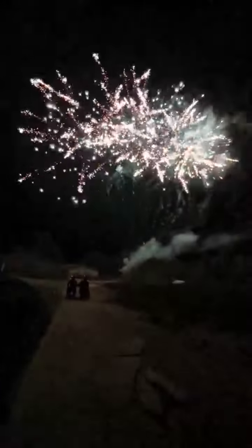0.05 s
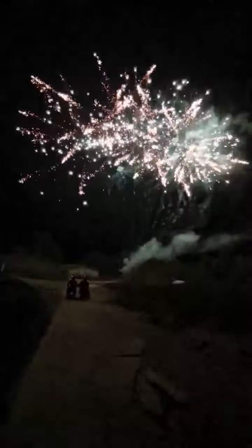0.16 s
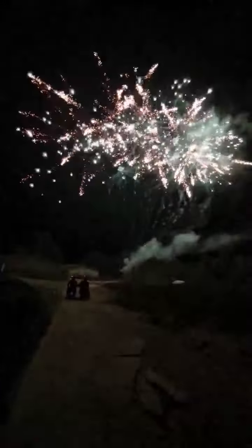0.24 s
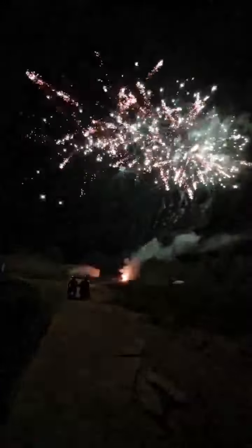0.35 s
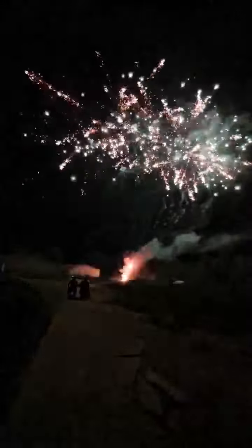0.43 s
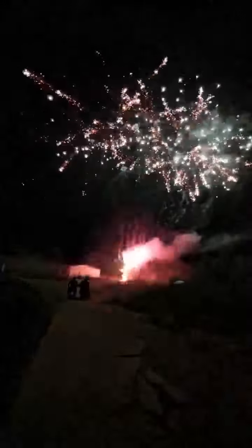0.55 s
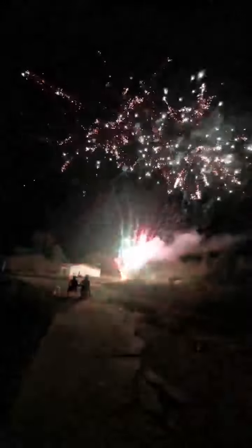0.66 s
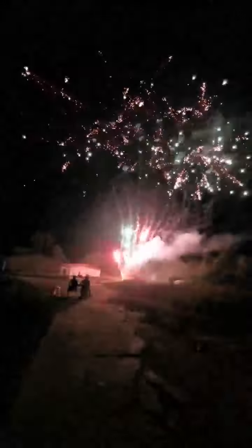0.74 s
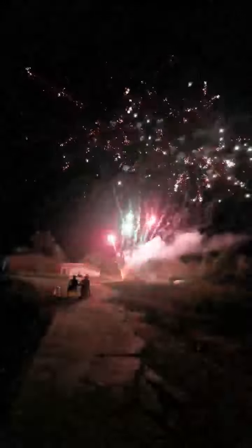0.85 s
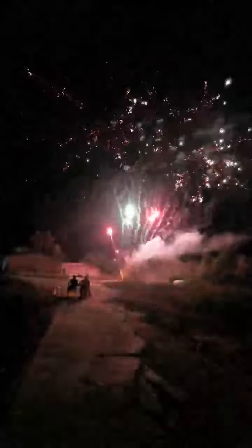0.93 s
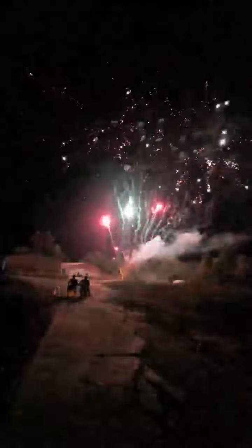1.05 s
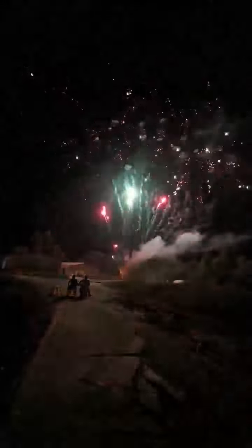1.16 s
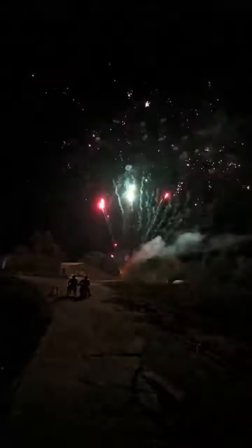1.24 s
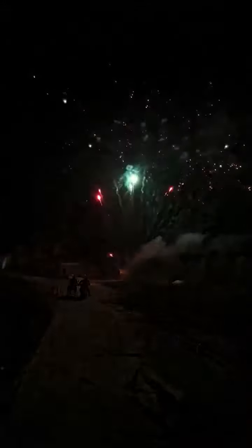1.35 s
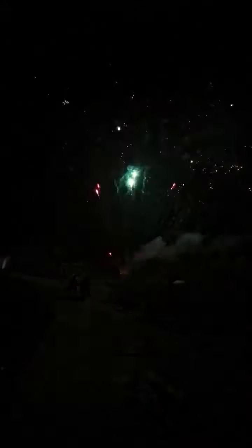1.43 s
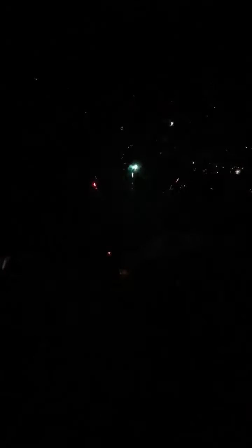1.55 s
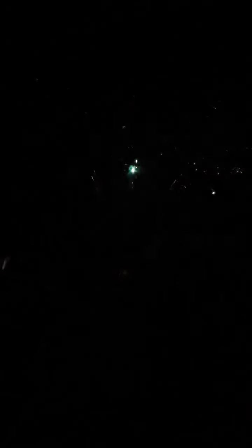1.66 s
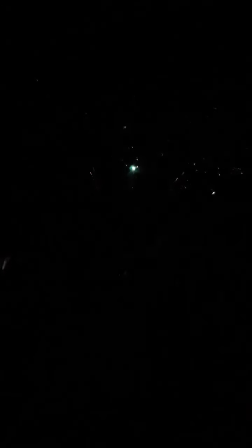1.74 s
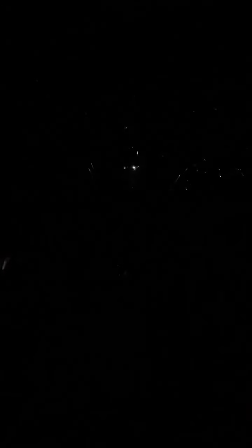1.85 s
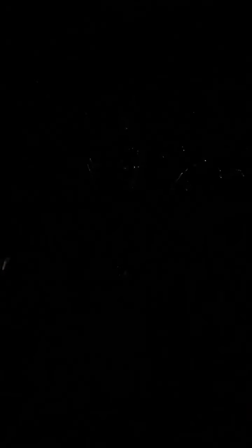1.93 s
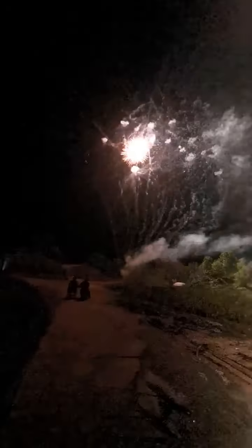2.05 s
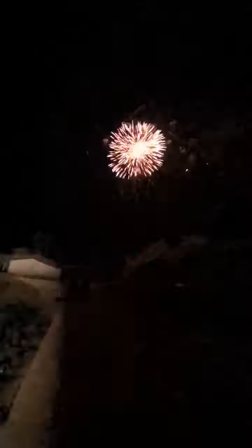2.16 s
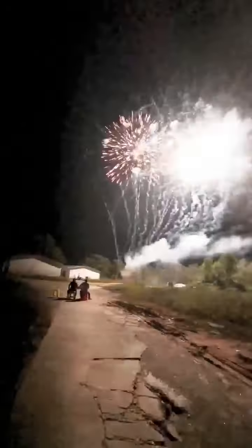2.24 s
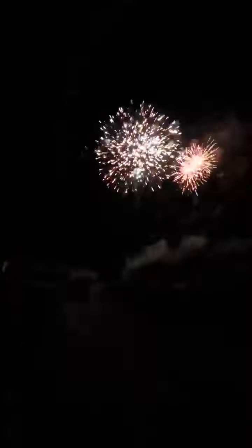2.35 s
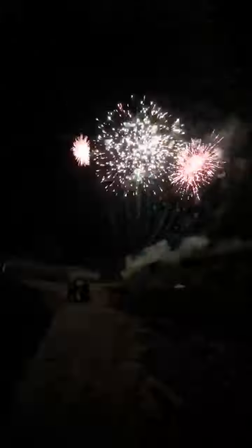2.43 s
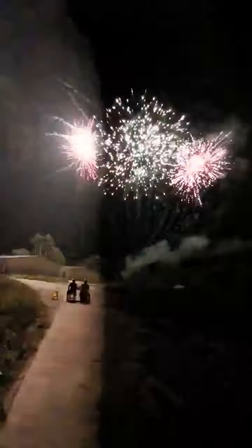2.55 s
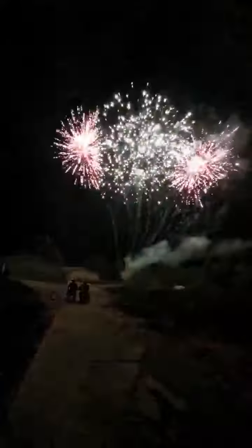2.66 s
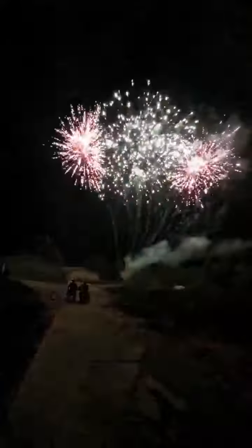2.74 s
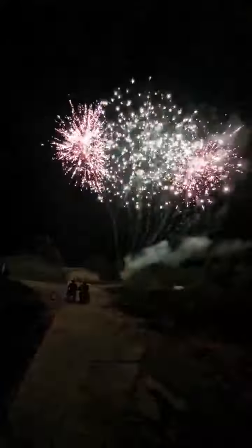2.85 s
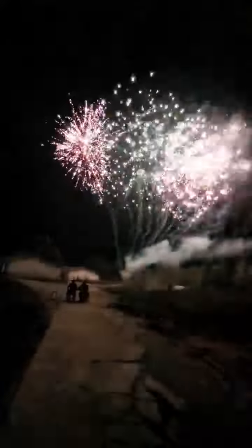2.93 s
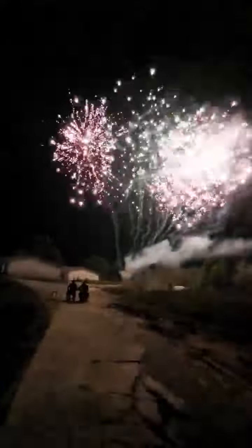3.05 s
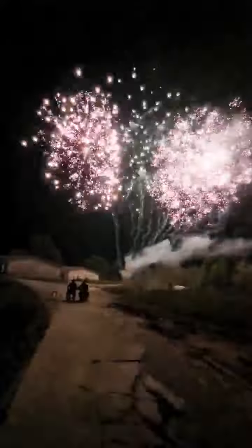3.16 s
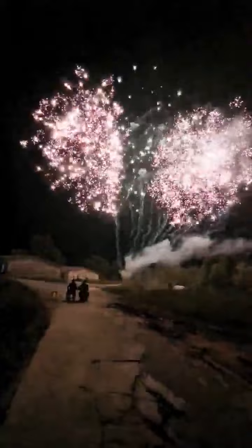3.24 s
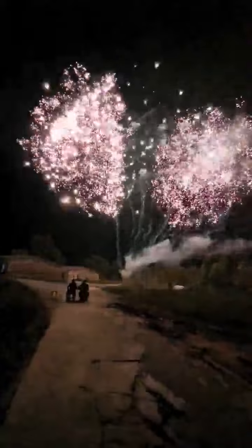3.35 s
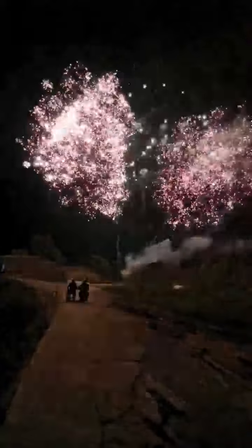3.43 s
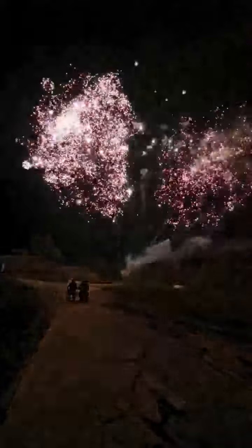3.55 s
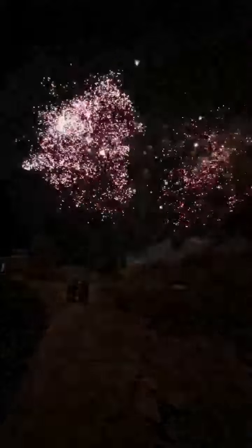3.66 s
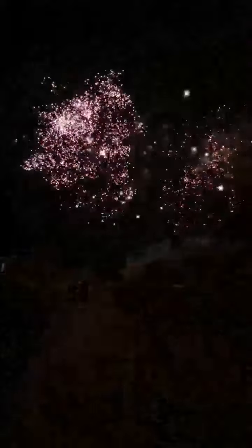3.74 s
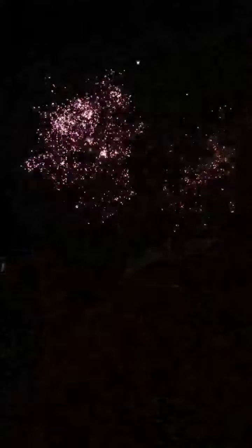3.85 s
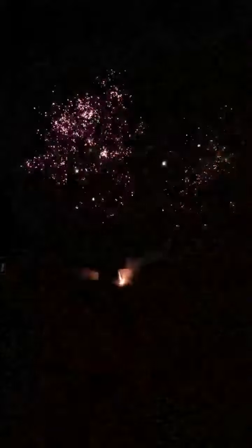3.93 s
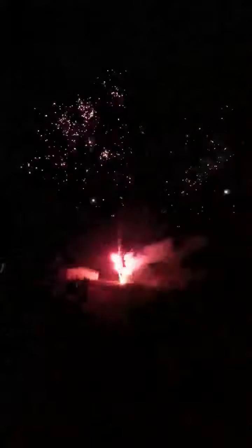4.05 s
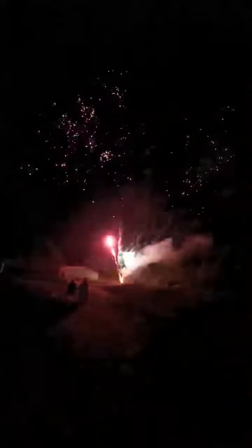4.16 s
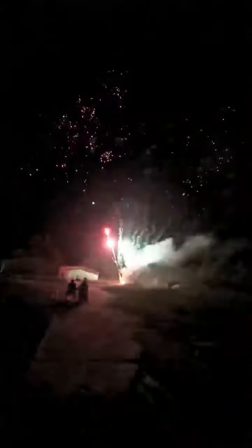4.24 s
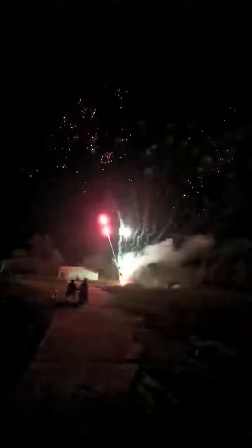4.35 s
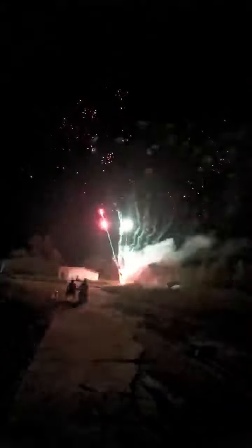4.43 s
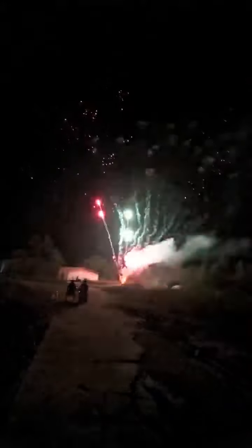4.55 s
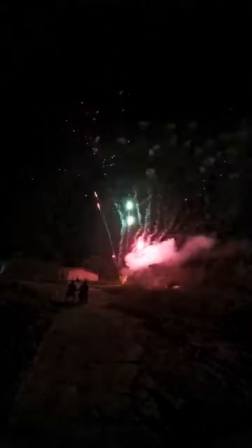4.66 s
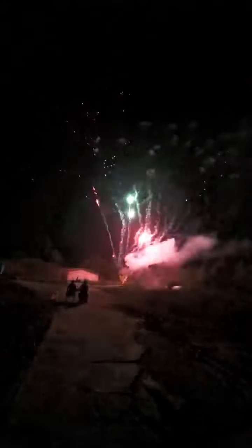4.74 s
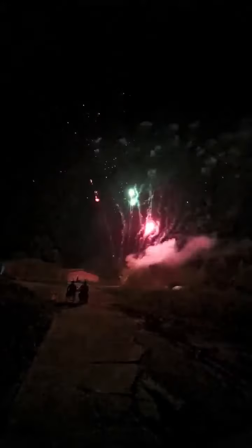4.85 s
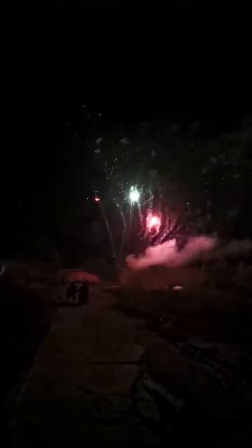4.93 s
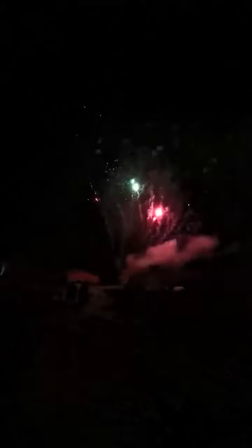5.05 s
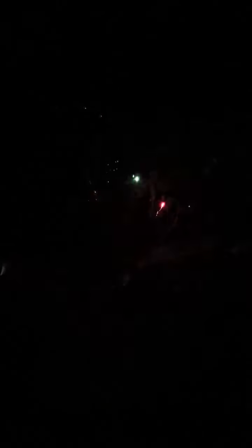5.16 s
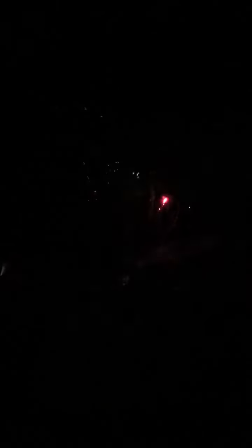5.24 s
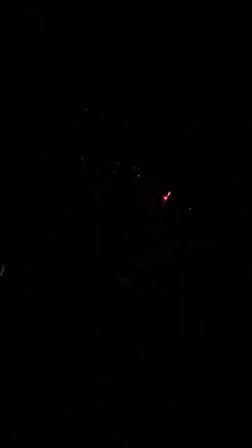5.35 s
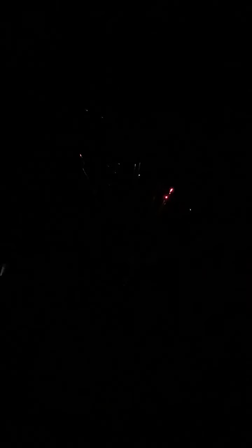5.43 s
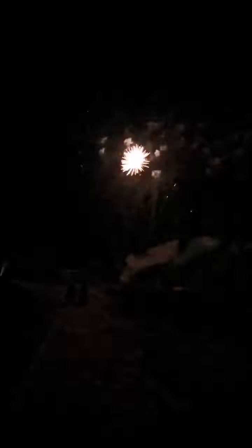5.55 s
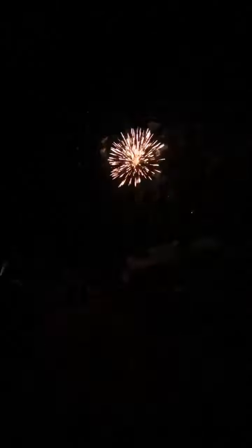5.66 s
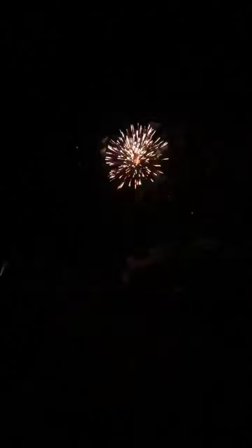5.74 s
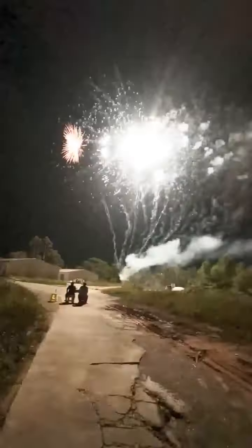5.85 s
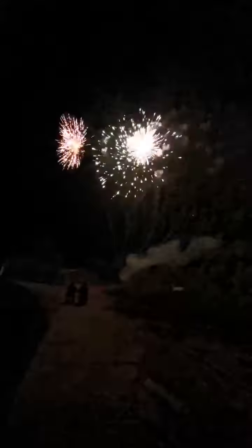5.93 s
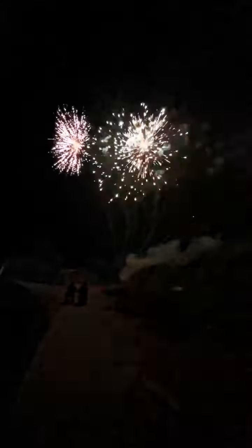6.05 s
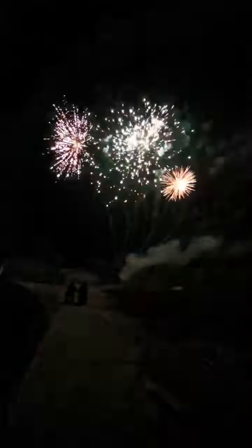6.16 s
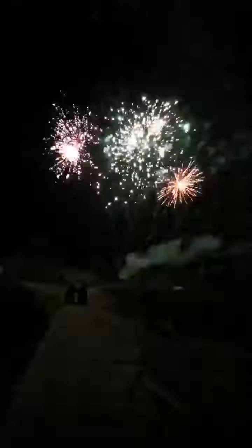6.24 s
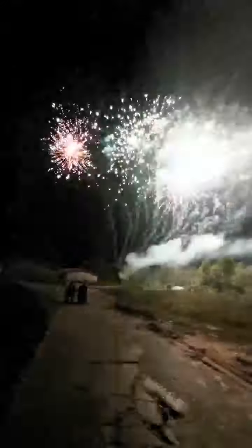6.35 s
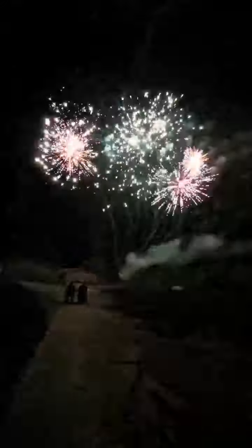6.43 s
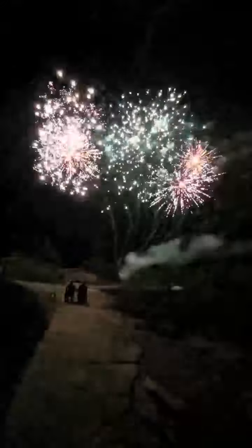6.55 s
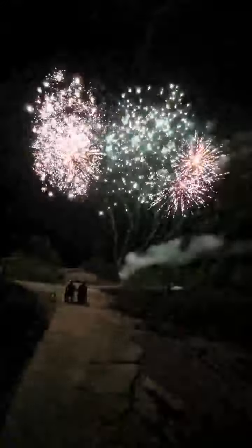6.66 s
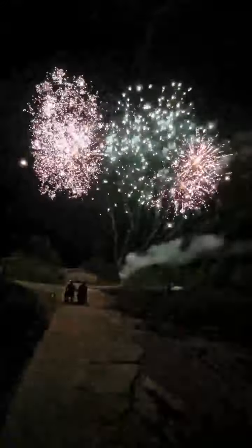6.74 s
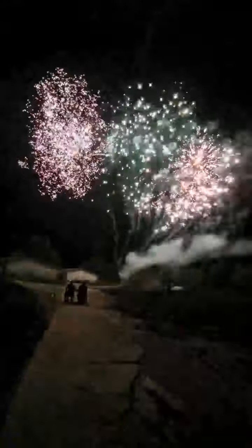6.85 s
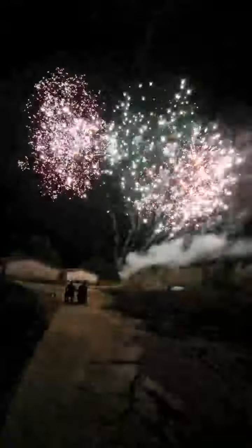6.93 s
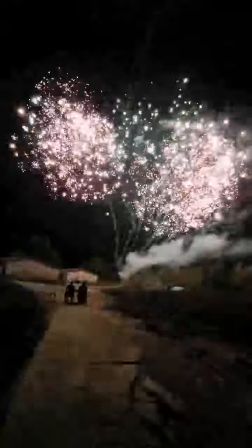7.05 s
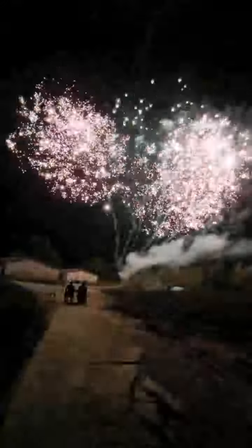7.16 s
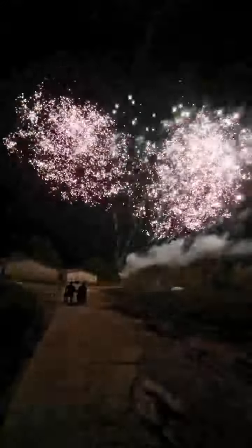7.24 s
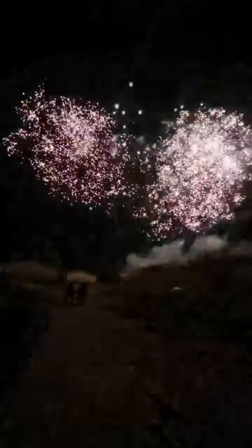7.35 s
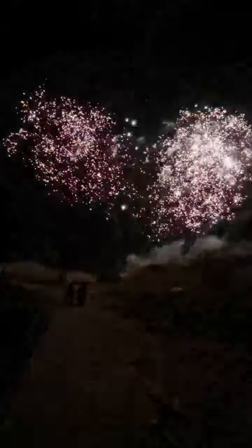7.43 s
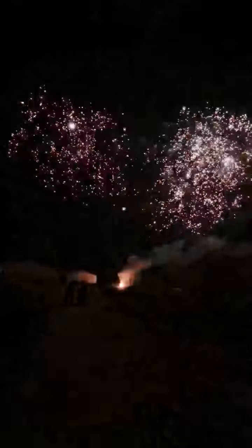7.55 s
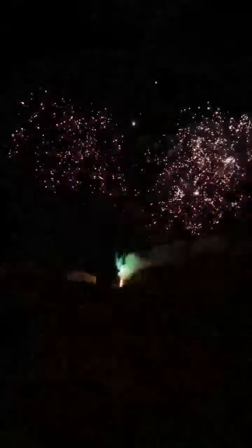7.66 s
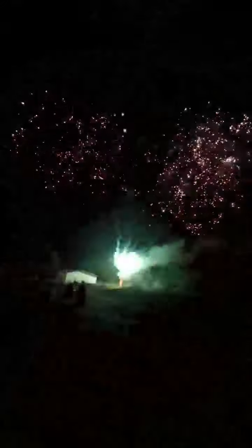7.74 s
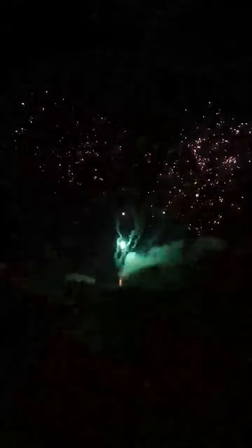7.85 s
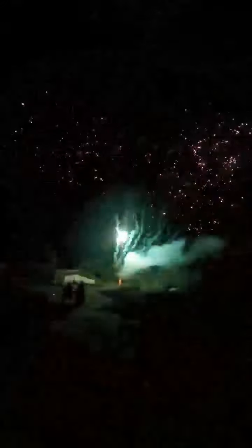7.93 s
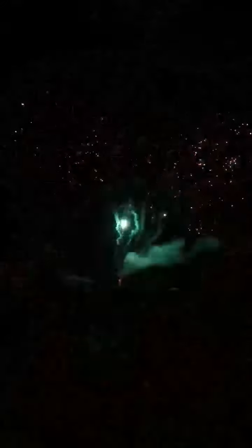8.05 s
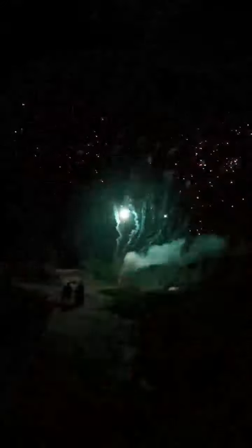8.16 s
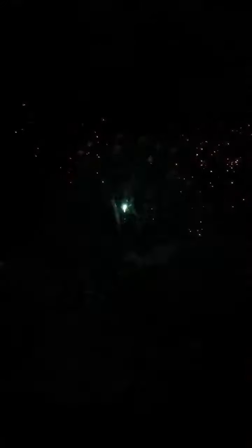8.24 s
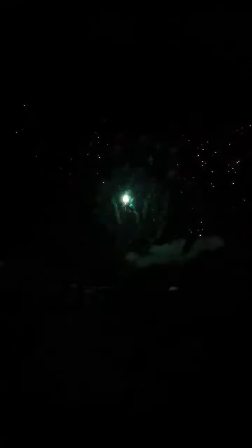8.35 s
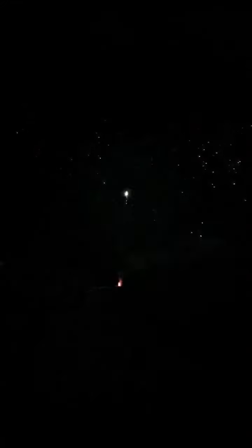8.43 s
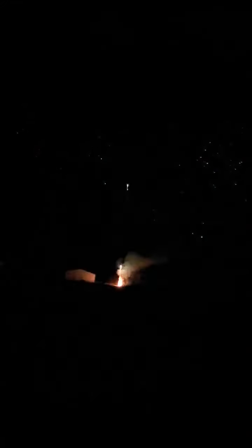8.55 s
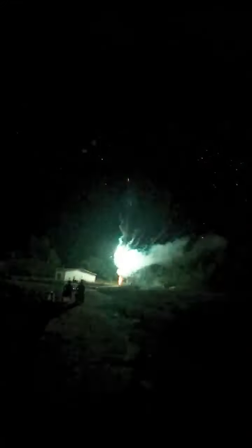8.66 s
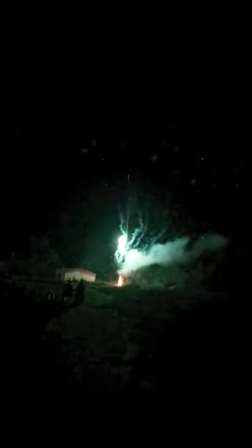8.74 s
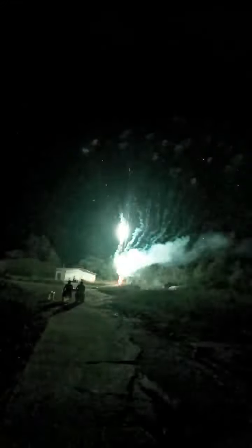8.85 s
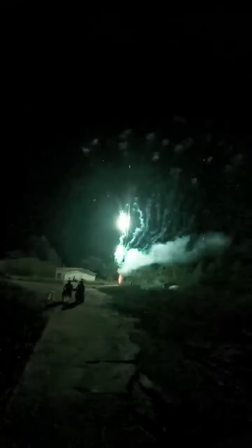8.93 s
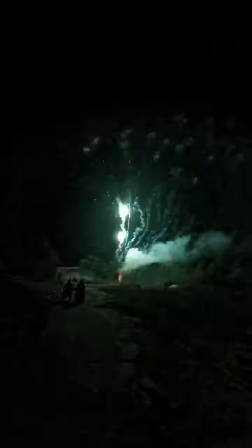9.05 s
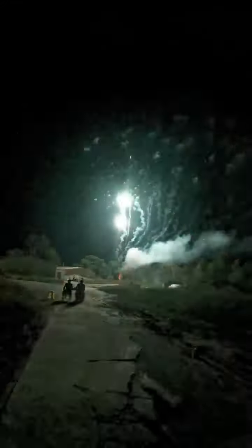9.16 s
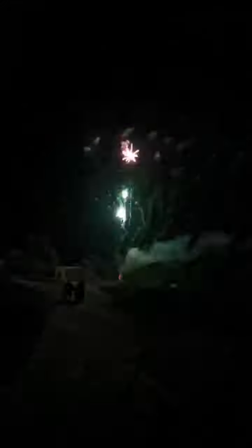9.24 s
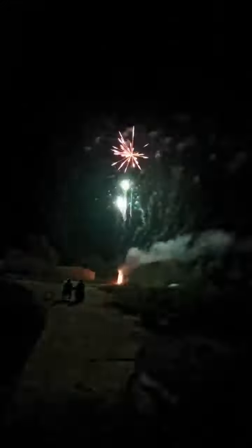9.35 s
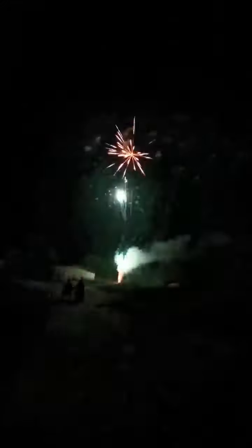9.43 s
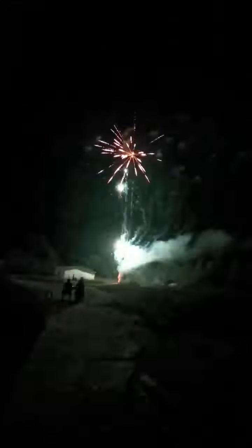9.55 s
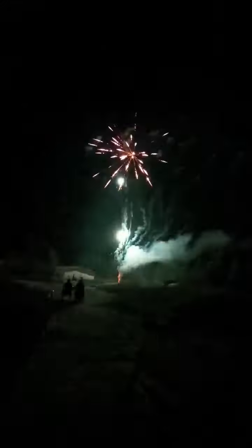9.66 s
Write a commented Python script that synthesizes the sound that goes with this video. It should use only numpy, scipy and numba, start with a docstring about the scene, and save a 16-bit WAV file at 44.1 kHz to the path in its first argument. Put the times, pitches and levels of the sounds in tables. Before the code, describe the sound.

Clusters of heavy firework thuds and sharp aerial bangs slap off nearby sheds, with sizzling crackle fading into quiet night air.

```python
"""Firework cake at night

Heard some sixty metres off, on open ground beside low sheds, over crickets and night air.
Lift charges thump from the tubes: pressure pulses over several paths, a crack, a knock, a shed slap.
Shells burst overhead: pulses straight and off the ground, shed echoes, a fence whistle, noise tails.
Stars crackle as random noise pops in four size bands; comet tails hiss as sputtering band noise.
The phone cuts bass, and its look-ahead compressor ducks just before each blast.
"""
import sys
import numpy as np
from scipy import signal
from scipy.fft import rfft, irfft
from scipy.io import wavfile
from scipy.ndimage import uniform_filter1d, minimum_filter1d
from numba import njit

SR = 44100
rng = np.random.default_rng(int(sys.argv[2]) if len(sys.argv) > 2 else 0)


def store_wav(level_fs):
    """Save 16-bit WAV to argv[1]."""
    pcm = np.round(np.clip(np.atleast_2d(level_fs), -1, 1) * 32767)
    wavfile.write(sys.argv[1], SR, pcm.T.astype(np.int16))


def makeup_ratio(level_db):
    """Linear amplitude ratio for a level in decibels (20 dB per factor of ten)."""
    decades = np.asarray(level_db, float) / 20
    return 10 ** decades


N = 427769
PREROLL = SR  # samples ahead of the start, for blasts already rolling


def unit(x):
    """Scale to rms 1."""
    return x / np.sqrt(np.mean(x ** 2))


def band(x, lo_hz, hi_hz):
    """Third-order Butterworth band-pass."""
    return signal.sosfilt(signal.butter(3, [lo_hz, hi_hz], "bandpass", fs=SR, output="sos"), x)


def lumps(count, width):
    """Slow random unevenness of rms 1: noise averaged over width samples."""
    return unit(uniform_filter1d(rng.standard_normal(count), size=width))


def colour(x, points):
    """Filter by (hz, gain_db) points; folding the cepstrum makes the response causal."""
    hz, gain_db = np.transpose(points)
    grid_hz = np.maximum(np.arange(1025) * SR / 2048, 1)
    gain = makeup_ratio(np.interp(np.log(grid_hz), np.log(hz), gain_db))
    ceps = irfft(np.log(gain))
    ceps[1:1024] *= 2
    ceps[1025:] = 0
    response = irfft(np.exp(rfft(ceps)))
    return signal.fftconvolve(x, response)[:len(x)]


def clicks(start_s, size):
    """Impulses on a time line that starts PREROLL samples early."""
    line = np.zeros(N + PREROLL)
    index = (np.asarray(start_s) * SR).astype(int) + PREROLL
    np.add.at(line, np.clip(index, 0, len(line) - 1), size)
    return line


def through(line, response):
    """Convolve, then drop the preroll."""
    return signal.fftconvolve(line, response)[PREROLL:PREROLL + N]


def spray(line, t60_s):
    """Each impulse becomes a noise burst of the same energy, decaying 60 dB in t60_s."""
    pole = makeup_ratio(-120 / (t60_s * SR))  # per-sample decay of power
    power = signal.lfilter([1 - pole], [1, -pole], line ** 2)
    return rng.standard_normal(len(line)) * np.sqrt(power)


def blast(push_ms, dull_hz):
    """Pressure jump, then suction; dulled on its way and rung by the phone's bass cut."""
    t = np.arange(SR // 10) / SR
    wave = -(1 - 1000 * t / push_ms) * np.exp(-200 * t / push_ms)
    pole = np.exp(-2 * np.pi * dull_hz / SR)
    wave = signal.lfilter([(1 - pole) ** 2], [1, -2 * pole, pole ** 2], wave)
    for cut_hz, q in ((265, 1.44), (52, 2.2)):
        w = 2 * np.pi * cut_hz
        b, a = signal.bilinear([1, 0, 0], [1, w / q, w ** 2], SR)
        wave = signal.lfilter(b, a, wave)
    return wave


def echoes(bands, start_ms, rise_ms, lumpy_db):
    """Adjoining noise bands, each decaying fast and slow; random lumps make the tail uneven."""
    t = np.arange(3 * SR) / SR
    uneven = makeup_ratio(lumpy_db * lumps(len(t), 300))
    hz = np.array(bands)[:, 0]
    edges_hz = np.r_[45, np.sqrt(hz[1:] * hz[:-1]), 14000]
    out = 0
    for lo_hz, hi_hz, row in zip(edges_hz, edges_hz[1:], bands):
        _, near_db, near_t60_s, far_db, far_t60_s = row
        noise = unit(band(rng.standard_normal(len(t)), lo_hz, hi_hz))
        near = makeup_ratio(near_db - 60 * t / near_t60_s)
        far = makeup_ratio(far_db - 60 * t / far_t60_s)
        out = out + noise * (near + far)
    onset = np.clip((1000 * t - start_ms) / rise_ms, 0, 1)
    return out * uneven * onset


def burning(lit_s, burn_s, level_db, die_db_per_s):
    """Level in dB of a charge that catches, burns evenly and dies away."""
    t = np.arange(N) / SR
    catch_db_per_s = 200
    catching_db = catch_db_per_s * np.maximum(lit_s - t, 0)
    dying_db = die_db_per_s * np.maximum(t - lit_s - burn_s, 0)
    return level_db - catching_db - dying_db


# Spectrum of the night: hz, gain_db
NIGHT_COLOUR = [(18, -38), (30, -2), (250, 4), (480, -11), (1200, -10.5), (2400, -17), (3300, -23.5),
                (5500, -25), (7000, -26), (9000, -60.5), (12000, -85)]


def night(level_db=-57):
    """Far traffic and air: steady coloured noise."""
    return makeup_ratio(level_db) * unit(colour(rng.standard_normal(N), NIGHT_COLOUR))


# Chirping bouts of one cricket: start_s, chirp_count
CHIRP_BOUTS = [(1.82, 3), (5.23, 4), (8.329, 2), (9.39, 1)]


def crickets(chirp_db=-68, chirp_every_s=.207, chorus_db=-75, far_db=-78):
    """One cricket chirps four overlapping falling strokes; a chorus trills lower, far ones shimmer."""
    u = np.linspace(0, 1, int(0.0346 * SR))
    stroke = np.sin(np.pi * u) * np.sin(2 * np.pi * np.cumsum(4400 - 480 * u) / SR)
    start_s = np.concatenate([first_s + chirp_every_s * np.arange(count) for first_s, count in CHIRP_BOUTS])
    stroke_s = start_s[:, None] + .023 * np.arange(4)
    stroke_db = chirp_db + 2.6 * rng.standard_normal(stroke_s.shape)
    chirps = through(clicks(stroke_s.ravel(), makeup_ratio(stroke_db).ravel()), stroke)
    uneven = 1 + 0.43 * lumps(N, 300)  # random unevenness in chirp loudness
    trill = 1 + .4 * np.sin(2 * np.pi * 50 * np.arange(N) / SR)
    chorus = makeup_ratio(chorus_db) * trill * unit(band(rng.standard_normal(N), 2560, 2760))
    far = makeup_ratio(far_db) * unit(band(rng.standard_normal(N), 4060, 4800))
    return uneven * chirps + far + chorus


# Tails of rising comets: fully_lit_s, burn_s, level_db
COMET_TAILS = [(7.9, 0.21, -53.5), (8.85, 0.092, -49.5), (9.12, 0.042, -72)]


def comets(fade_db_per_s=42.5):
    """Burning tails hiss and sputter as they climb: two noise bands under an uneven level."""
    level = sum(makeup_ratio(burning(*row, fade_db_per_s)) for row in COMET_TAILS)
    sputter = makeup_ratio(2.7 * lumps(N, 400))
    hiss = unit(band(rng.standard_normal(N), 1600, 2570))
    sizzle = makeup_ratio(-4.0) * unit(band(rng.standard_normal(N), 3840, 4850))
    return level * sputter * (hiss + sizzle)


# Single late stars: start_s, level_db
LATE_STARS = [(1.1493, -31), (1.266, -35), (1.3377, -26), (1.366, -33), (1.437, -35), (1.5239, -45),
              (1.6102, -48), (1.7147, -31.5), (1.7735, -33.5), (1.8428, -37), (2.056, -47), (7.693, -23),
              (7.7464, -23), (7.7638, -22), (7.7834, -22), (7.9641, -21)]


def late_pops(snap_db=16.5, bounce_db=-3):
    """Lone small stars: bright noise snaps with a ground bounce and a short smear."""
    start_s, level_db = np.transpose(LATE_STARS)
    straight = clicks(start_s, makeup_ratio(level_db))
    bounce = clicks(start_s + 0.004, makeup_ratio(level_db + bounce_db))
    pops = (straight + bounce)[PREROLL:]
    sound = spray(pops, t60_s=.005) + makeup_ratio(-7) * spray(pops, t60_s=.07)
    return makeup_ratio(snap_db) * band(sound, 1670, 6340)


# Clouds of crackling stars: fully_lit_s, burn_s, level_db, small_over_big_db (per size step)
STAR_CLOUDS = [(0.02, 0.23, -38.5, 3), (.24, .2, -36.5, 4.5), (.52, 0.19, -37.5, 3.5),
               (.79, 0.0067, -34, 2), (.9, 0.02, -41.5, 2), (1.023, 0.005, -41, 4),
               (1.165, 0.0096, -44, 2.5), (1.335, 0.12, -56, 2), (3.207, 0.21, -22, 0),
               (3.505, 0.19, -23, 0.2), (4.063, 0.014, -48, 0), (6.798, 0.15, -24, -0.4),
               (7.02, 0.13, -27, 0), (7.19, 0.089, -22, 0.2), (7.35, 0.017, -23, 0),
               (7.468, 0.036, -25, -0.4)]
# Spectrum of the crackle: hz, gain_db
CRACKLE_SPECTRUM = [(88, -37), (150, -2.5), (204, -2.5), (425, 1.5), (674, 8), (1700, 5), (2360, 8.5),
                    (3470, 2.5), (4370, 4.5), (6060, 0.5), (12600, -19), (14200, -24), (15000, -75)]


def crackle(dense_per_s=6000, dense_db=-31.5, thinning=.3, spread_db=2.0, wet_db=-3, wet_t60_s=0.044,
            patchy_db=1.5, die_db_per_s=105):
    """Tiny random pops, fewer when the level is low; big stars pop low, small ones high, in own patches."""
    late_db, late_die_db_per_s, late_dull_db = -20, 22.5, -3.5  # late crackle lingers, thin and duller
    power, mix = 1e-12, 0
    for lit_s, burn_s, db, small_db in STAR_CLOUDS:
        cloud = makeup_ratio(burning(lit_s, burn_s, db, die_db_per_s)) ** 2
        late = makeup_ratio(burning(lit_s, burn_s, db + late_db, late_die_db_per_s)) ** 2
        power = power + cloud + late
        mix = mix + cloud * small_db + late * (small_db + late_dull_db)
    level_db = 10 * np.log10(power)
    small_db = mix / power
    chance = dense_per_s * makeup_ratio(thinning * (level_db - dense_db)) / SR  # per sample
    out = 0
    for size, (lo_hz, hi_hz) in enumerate(((100, 1200), (1200, 3500), (3500, 7500), (7500, 15000))):
        patches_db = patchy_db * lumps(N, 900)
        strength = makeup_ratio(spread_db * np.minimum(rng.exponential(1, N), 4.5))
        pops = (rng.random(N) < chance) * strength / np.sqrt(chance)
        pops = pops * makeup_ratio(level_db + patches_db + (size - 1) * small_db)
        snap = spray(pops, t60_s=.003)
        wet = makeup_ratio(wet_db) * spray(pops, wet_t60_s)
        out = out + band(snap + wet, lo_hz, hi_hz)
    return colour(out, CRACKLE_SPECTRUM) * makeup_ratio(-2.0)


# Lift charges: start_s, level_db, echo_tail_db, crack_db (both relative to level)
LIFT_CHARGES = [(0.5917, -3.5, 4.5, -26.5), (0.6274, 1, -5, -38), (0.6695, 2, -1.5, -22.5),
                (0.7524, -1.5, 5, -24), (0.8074, 3.5, 0, -23.5), (0.8667, 1, -1, -20.5),
                (4.1262, 0, 3.5, -27), (4.1871, 2.5, -0.5, -24), (4.2292, 0, 0.5, -21), (4.496, 4, -1, -20),
                (4.549, 2, 0, -21.5), (4.6185, -0.5, -1, -18.5), (7.794, -4.5, 0, -20),
                (8.7173, -0.5, 1.5, -25), (8.7935, 4, -0.5, -22), (9.0139, 1, 1, -18),
                (9.6229, -1, 8.5, -24)]
# Ways from tubes to phone, over the grass, then off shed walls: delay_ms, level_db, dull_above_hz
LIFT_WAYS = [(-.13, 2.3, 340), (0, -15, 1800), (2.6, -16, 1500), (15.4, -7, 3200), (16.2, -12, 3000),
             (17.9, -16, 2500), (18.55, -4.4, 300), (30.5, -17, 700)]
# Scattered echoes of a lift: hz, near_db, near_t60_s, far_db, far_t60_s
LIFT_SCATTER = [(61.2, -17.5, 0.11, -61.5, 3.5), (135, -44.5, 0.33, -53, 2.2), (288, -24.5, 0.29, -57, 3.7),
                (470, -39, 0.14, -74, 0.78), (776, -9.5, 0.055, -63, 2.6), (1300, -20, 0.082, -56.5, 1.75),
                (2450, -52, 0.16, -55.5, 1.57), (4620, -40, 0.13, -53.5, 0.84),
                (6500, -46.5, 0.21, -60, 1.17), (9500, -44.5, 0.16, -80, .7)]


def lifts(slap_db=8.0, shed_s=.0154, tube_hz=700, tube_t60_s=.035, tube_db=-21):
    """All from one spot, so all share ways and echoes; the sharp crack differs by tube."""
    s, db, tail_db, crack_db = np.transpose(LIFT_CHARGES)
    direct = 0
    for delay_ms, way_db, dull_hz in LIFT_WAYS:
        direct = direct + through(clicks(s + delay_ms / 1000, makeup_ratio(db + way_db)), blast(6, dull_hz))

    edge = through(clicks(s, makeup_ratio(db + crack_db)), blast(.5, 5000))
    shed_edge = through(clicks(s + shed_s, makeup_ratio(db + crack_db)), blast(0.57, 5000))
    edge = edge + makeup_ratio(-4.5) * shed_edge
    crack = edge + band(spray(edge, t60_s=0.0065), 1000, 10000)

    # the launch tube knocks, again off the shed
    t = np.arange(SR // 10) / SR
    knock = -np.sin(2 * np.pi * tube_hz * t) * makeup_ratio(tube_db - 60 * t / tube_t60_s)
    knock_db = db + 2.2 * rng.standard_normal(len(s))
    knocks = through(clicks(s, makeup_ratio(knock_db)) + clicks(s + shed_s, makeup_ratio(knock_db - 6.0)), knock)

    tail = through(clicks(s, makeup_ratio(db + tail_db)), echoes(LIFT_SCATTER, start_ms=15.4, rise_ms=4, lumpy_db=2.5))

    # the ribbed shed wall scatters a mid-pitched slap
    slap = band(spray(clicks(s + shed_s, makeup_ratio(db + slap_db))[PREROLL:], t60_s=0.025), 950, 1930)
    slap = slap + through(clicks(s + shed_s, makeup_ratio(db - 9.5)), band(blast(1.3, 1750), 720, 2700))
    return direct + crack + knocks + slap + tail


def fence_whistle(start_s=0.06, length_s=.19, high_hz=1900, low_hz=900, rough=0.61):
    """Roughly evenly spaced posts return a blast as an uneven falling tone."""
    u = np.clip((np.arange(SR // 2) / SR - start_s) / length_s, 0, 1)
    uneven = 1 + rough * lumps(len(u), 250)
    pitch_hz = low_hz + (high_hz - low_hz) * (1 - u) ** 2
    return uneven * np.sin(np.pi * u) * np.sin(2 * np.pi * np.cumsum(pitch_hz) / SR)


def ribbed_ping(start_s=.078, length_s=.022, high_hz=3100, low_hz=2800):
    """A far ribbed wall returns a blast as one short high ping."""
    u = np.clip((np.arange(SR // 2) / SR - start_s) / length_s, 0, 1)
    pitch_hz = high_hz + (low_hz - high_hz) * u
    return np.sin(np.pi * u) * np.sin(2 * np.pi * np.cumsum(pitch_hz) / SR)


# Shell bursts, negative starts still rolling: start_s, level_db, echo_tail_db, ground_lag_ms, shed_echo_db
SHELL_BURSTS = [(-.3, 0.5, 5.5, 5.6, -8), (-.12, -7, 0, 6.1, -6), (2.3414, 4, 3.5, 5.57, -0.5),
                (2.5169, -0.5, 3, 5.1, -6.5), (2.5656, -2, 2, 6.6, -3), (2.7039, -3.5, 3, 6.57, -24.5),
                (2.8741, -5.5, 3.5, 6.31, -4), (5.8623, 0, 4, 5.6, -23), (6.1126, -2.5, 4.5, 5.8, -7),
                (6.2168, 1, 2.5, 5.47, -10), (6.435, -1.5, 2.5, 4.8, -3.5), (6.5581, -1, 3, 5.45, -2),
                (6.6901, 0.5, 1, 6.1, -4.5), (9.554, -1, 3.5, 6.2, -5.5)]
# Ways from the sky, straight then off the ground: boom_db, dull_above_hz, shock_edge_db
SKY_WAYS = [(4.9, 304, -2.5), (-0.5, 770, -10)]
# Scattered echoes of a burst: hz, near_db, near_t60_s, far_db, far_t60_s
BURST_SCATTER = [(61.2, -47, 0.73, -44, 3.3), (134.5, -28.5, 0.091, -35, 2.4),
                 (242, -20, 0.31, -33.5, 2.77), (608, -22, 0.13, -39, 1.2), (985, -25, 0.3, -47.5, 4),
                 (1890, -26.5, 0.22, -37, 1.34), (4260, -36.5, 0.35, -39.5, 1.24),
                 (6420, -42, 0.69, -43.5, 0.43), (9720, -44.5, 0.46, -74, .7)]


def bursts(crack_db=5.0, bark_db=-7, shed_s=.0146, shed_ground_lag_ms=6.1):
    """Each bursts elsewhere in the sky: own ground lag, shed echo and mix of two echo patterns."""
    s, db, tail_db, lag_ms, shed_db = np.transpose(SHELL_BURSTS)
    whistle_db = db - 43 - .6 * shed_db  # shells away from the sheds face the fence
    out = through(clicks(s, makeup_ratio(whistle_db)), fence_whistle() + makeup_ratio(3.0) * ribbed_ping())

    heard_s = np.r_[s, s + shed_s]  # straight, then over the shed wall
    heard = makeup_ratio(np.r_[db, db + shed_db])
    ground_ms = np.r_[lag_ms, shed_ground_lag_ms + 0 * s]
    for way_ms, (boom_db, dull_hz, edge_db) in zip((0, ground_ms), SKY_WAYS):
        boom_s = heard_s + (way_ms - .6) / 1000
        out = out + through(clicks(boom_s, heard * makeup_ratio(boom_db)), blast(1.04, dull_hz))
        edge_s = heard_s + way_ms / 1000
        out = out + through(clicks(edge_s, heard * makeup_ratio(edge_db)), blast(.5, 5000))

    bark_s = np.r_[heard_s, s + lag_ms / 1000]
    bark = np.r_[heard, makeup_ratio(db)] * makeup_ratio(bark_db)
    out = out + through(clicks(bark_s, bark), band(blast(1.04, 1500), 500, 1800))
    crack = spray(clicks(s, makeup_ratio(db + crack_db)), t60_s=0.019)[PREROLL:]
    out = out + band(crack, 700, 9900)

    angle = rng.uniform(0, 2 * np.pi, len(s))
    for share in (np.cos(angle), np.sin(angle)):
        pattern = echoes(BURST_SCATTER, start_ms=5.1, rise_ms=1.0, lumpy_db=2.5)
        out = out + through(clicks(s, share * makeup_ratio(db + tail_db)), pattern)
    return out


def scene():
    """Everything at the one microphone."""
    return (night() + crickets() + comets() + late_pops() + crackle() + lifts() + bursts())[None]


@njit
def recover(gain, step):
    """Gain drops at once and climbs back slowly."""
    out, g = np.empty(len(gain)), 1.
    for i in range(len(gain)):
        g = min(gain[i], g + (1 - g) * step)
        out[i] = g
    return out


def low_pass(x):
    """Removes everything above the highest recorded frequency."""
    return signal.sosfilt(signal.butter(12, 15190, fs=SR, output="sos"), x)


def record(dry, top_db=-9, ratio=1.96, ahead_ms=14, release_s=0.12, ceiling=0.71):
    """Microphone loses the deepest bass; look-ahead compressor ducks early; peaks round off."""
    dry = signal.sosfilt(signal.butter(1, 30, "highpass", fs=SR, output="sos"), dry)
    ahead = int(ahead_ms * SR / 1000)
    need = np.minimum(1, makeup_ratio(top_db) / (np.abs(dry[0]) + 1e-9)) ** (1 - 1 / ratio)
    gain = recover(minimum_filter1d(need, 2 * ahead + 1), 1 / (release_s * SR))
    held = dry * uniform_filter1d(gain, size=200)
    mix = np.tanh(held / ceiling) * ceiling
    return low_pass(mix)


dry = scene()
out = record(dry)
store_wav(out)
```